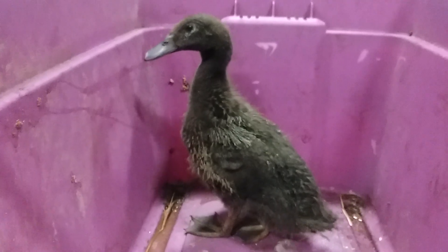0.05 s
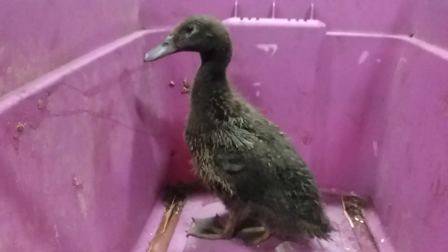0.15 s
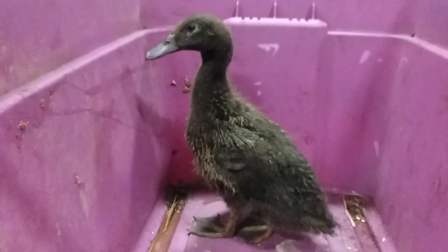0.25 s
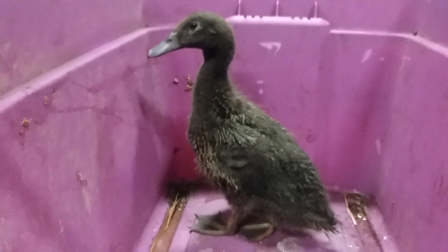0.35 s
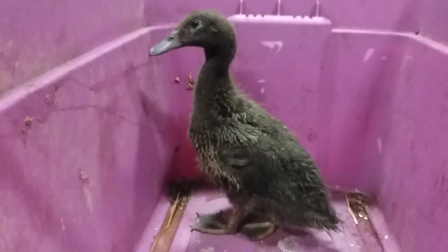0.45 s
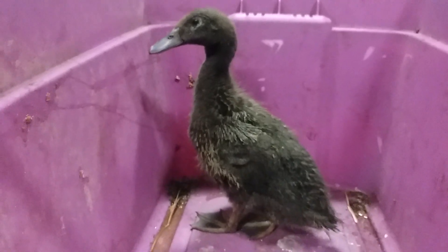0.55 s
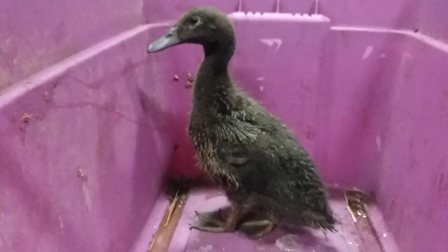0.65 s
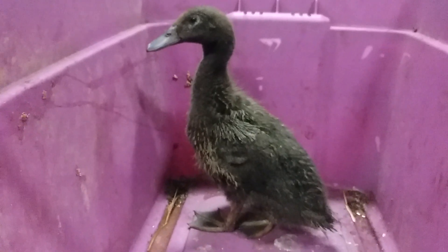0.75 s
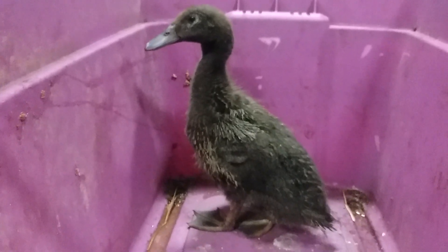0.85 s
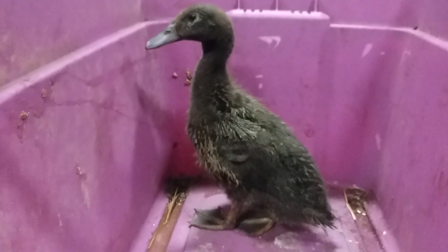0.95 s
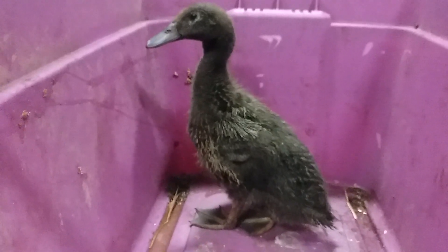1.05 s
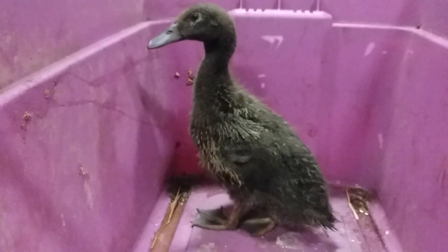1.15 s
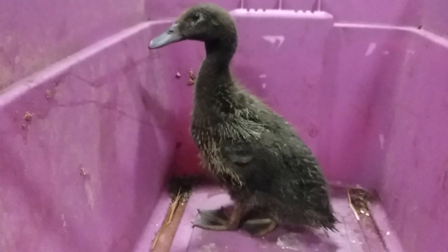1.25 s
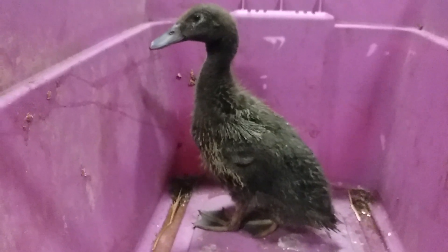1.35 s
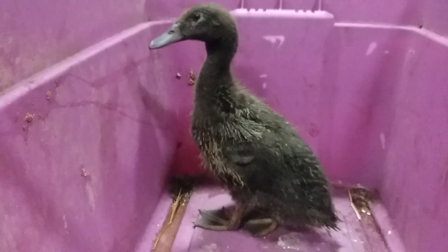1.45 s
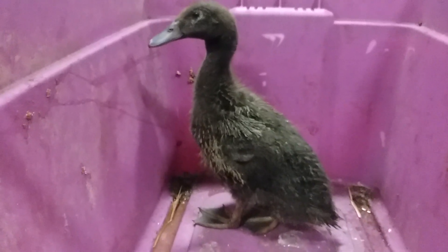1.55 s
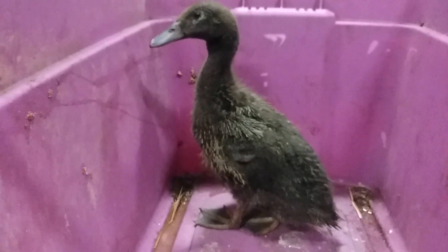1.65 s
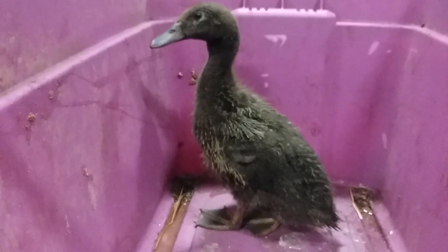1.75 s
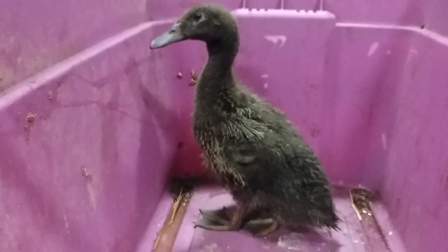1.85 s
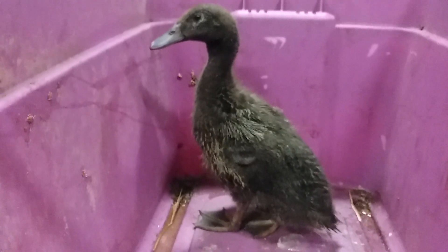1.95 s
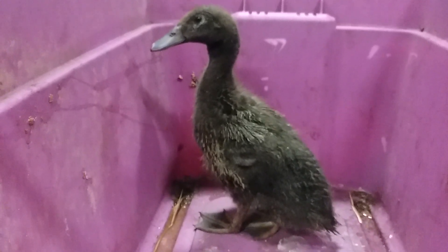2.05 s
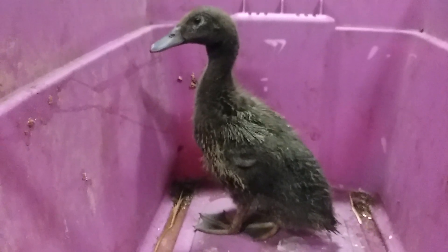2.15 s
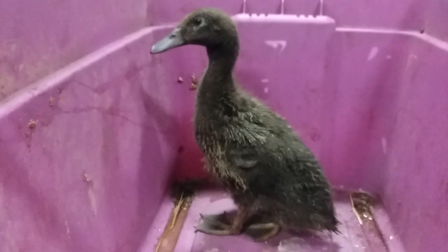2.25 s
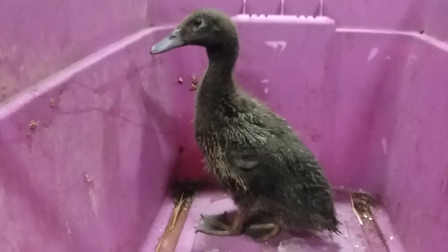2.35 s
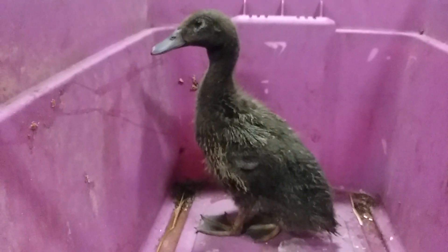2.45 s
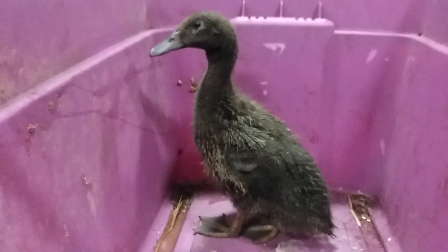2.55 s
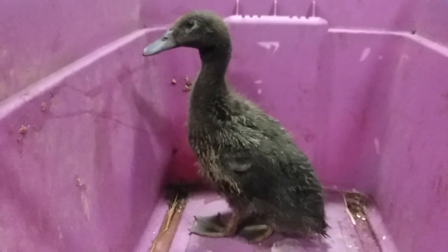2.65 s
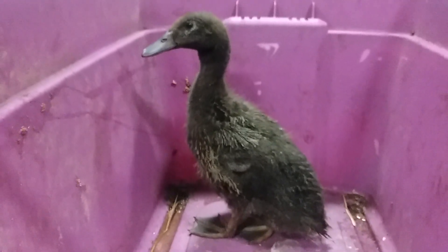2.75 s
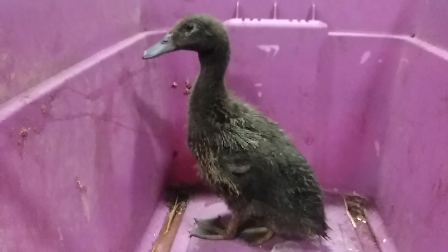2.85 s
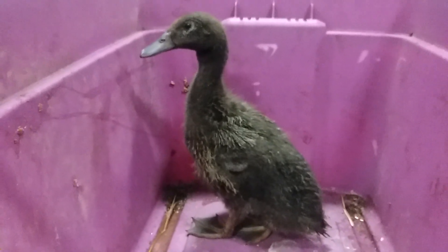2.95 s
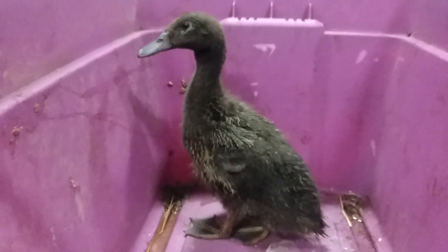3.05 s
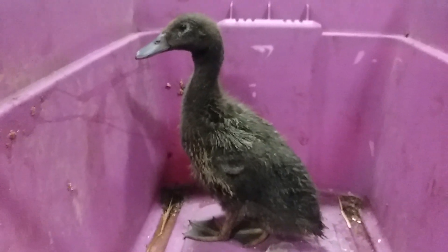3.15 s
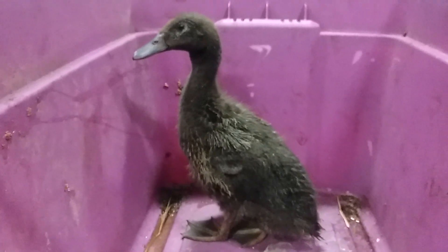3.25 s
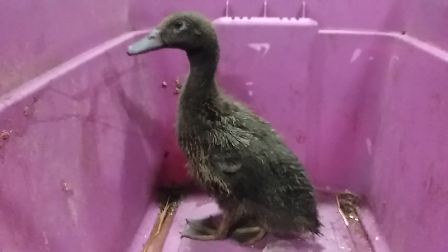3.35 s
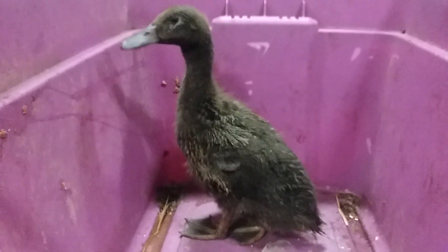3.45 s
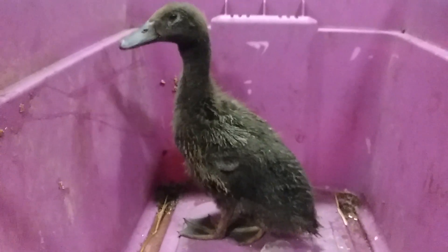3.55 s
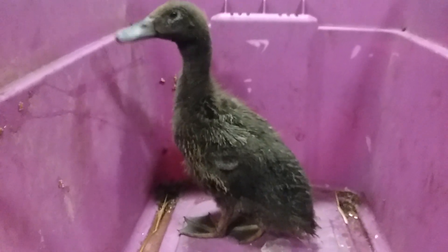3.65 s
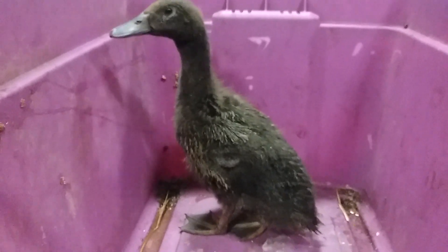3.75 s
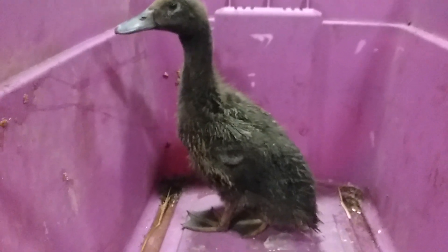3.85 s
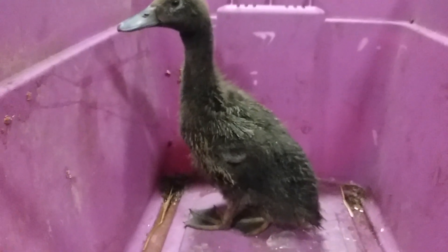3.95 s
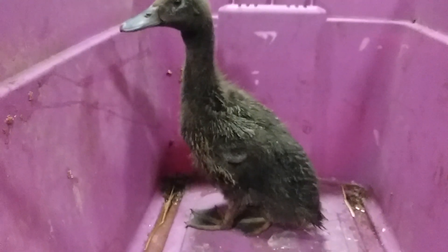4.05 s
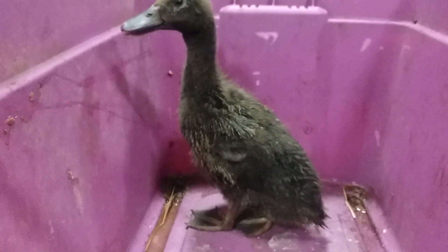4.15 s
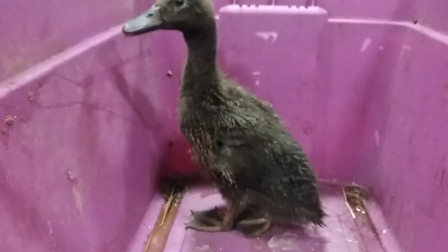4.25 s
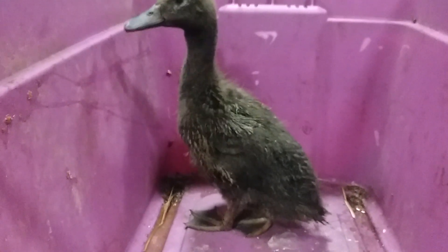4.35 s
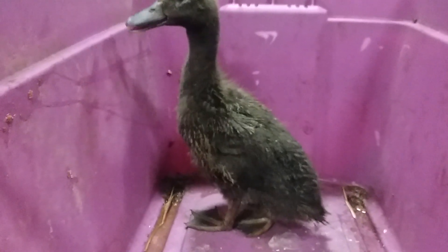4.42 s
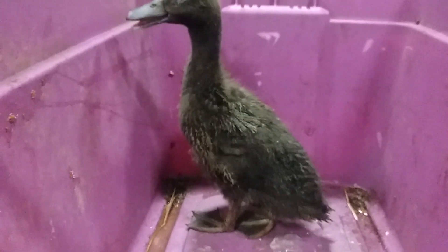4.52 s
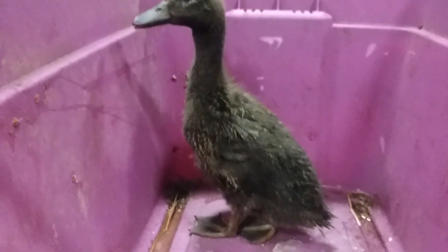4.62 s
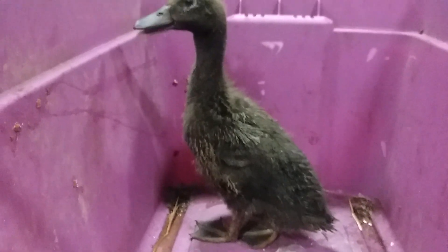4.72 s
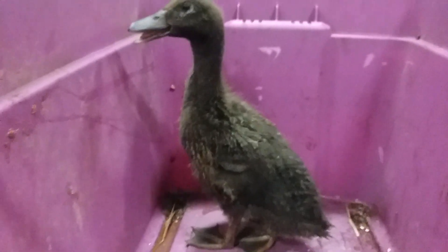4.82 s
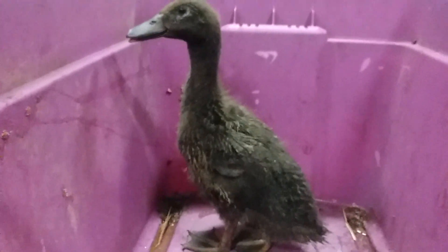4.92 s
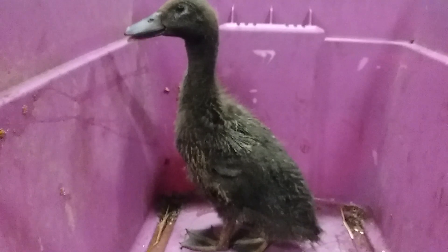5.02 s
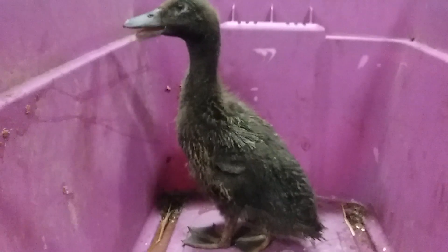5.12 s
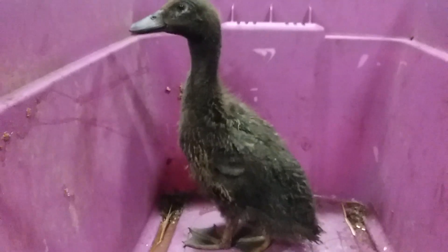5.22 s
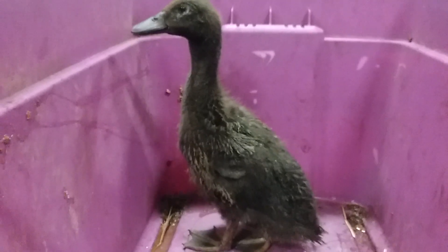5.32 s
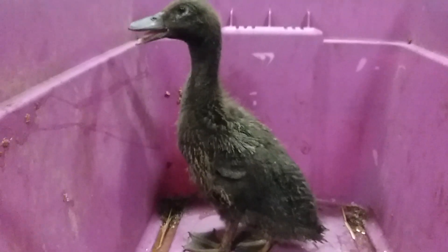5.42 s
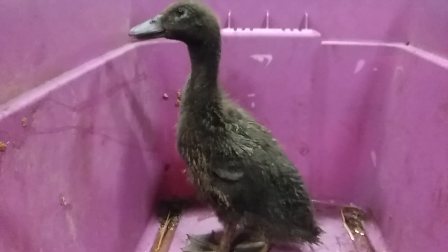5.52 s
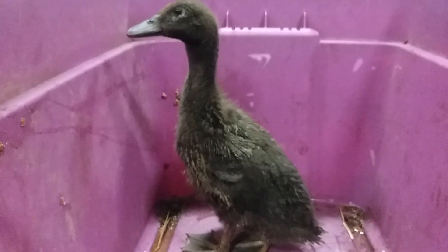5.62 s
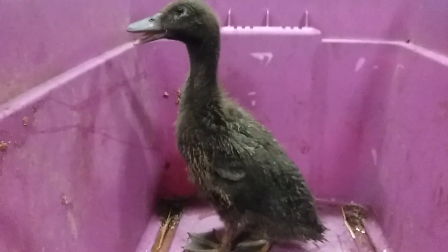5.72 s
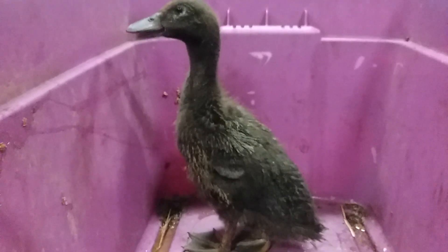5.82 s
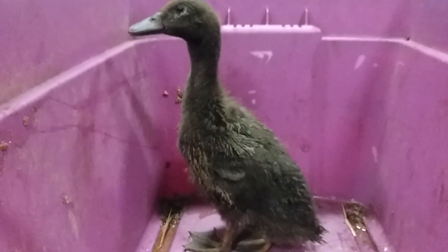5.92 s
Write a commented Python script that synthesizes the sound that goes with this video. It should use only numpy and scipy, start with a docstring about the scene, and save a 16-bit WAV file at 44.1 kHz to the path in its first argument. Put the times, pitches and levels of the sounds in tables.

```python
"""Indoors, a duckling stands in a plastic bin near two microphones, while other birds chirp far away.
After four seconds it peeps three times a second: each peep starts as a short rasping grunt, locks into
a loud whistle joined by a second, higher voice, and droops at the end. Its feet pat and scratch the bin.
The voice is built from sine waves, pulses and hiss, the feet from fading tones and filtered noise.
Standing waves in the bin and echoes color the sound; far birds are mostly gliding tones over patchy hiss."""
import sys
import numpy as np
from scipy import signal
from scipy.fft import rfft, irfft
from scipy.io import wavfile
from scipy.ndimage import uniform_filter1d

SR = 44100
rng = np.random.default_rng(int(sys.argv[2]) if len(sys.argv) > 2 else 0)


def generate_wav(signal):
    """Clip the signal to [-1, 1] and save it as 16-bit WAV at the path in sys.argv[1]."""
    frames = np.transpose(np.atleast_2d(signal))
    scaled = np.clip(frames, -1, 1) * 32767
    pcm = np.round(scaled).astype(np.int16)
    wavfile.write(sys.argv[1], SR, pcm)


N = 263718

# one row a peep: (start t/s, length/s, held pitch f/Hz, depth of the pitch sag f/Hz, effort/dB,
#                  relative throaty buzz/dB, relative rasp/dB, second voice enters after t/s,
#                  extra left minus right/dB as the head turns)
PEEP_ROWS = [(4.067, .141, 2000, 260, -6, -22.5, -39, .068, 3),
             (4.371, .135, 2035, 85, -5, -50, -18, .036, 3),
             (4.683, .133, 2120, 110, 0, -30, -13, .029, .5), (4.994, .133, 2150, 90, 0, -50, -13, .032, 3),
             (5.317, .133, 2155, 120, 0, -47, -13.5, .031, 6),
             (5.639, .138, 2140, 95, 0, -55, -15, .033, 6), (5.961, .135, 2140, 100, 0, -22, -16, .032, 0)]


def gain_of(db):
    """Turns decibels into amplitude."""
    return 10 ** (np.asarray(db) / 20)


def evened(x):
    """Scales a sound to an average strength (rms) of 1."""
    return x / np.sqrt(np.mean(abs(x) ** 2) + 1e-20)


def read(points, hz):
    """Reads a table between its points, on a log-frequency axis."""
    f, value = np.transpose(points)
    return np.interp(np.log(hz + 1), np.log(f + 1), value)


def add(mix, s, sound):
    """Mixes a sound in at time s, in seconds."""
    part = mix[max(round(s * SR), 0):][:len(sound)]
    part += sound[:len(part)]


def noise(points, size):
    """Makes hiss of rms 1 whose strength at each frequency follows a table."""
    shape = gain_of(read(points, np.fft.rfftfreq(size, 1 / SR)))
    return evened(irfft(rfft(rng.standard_normal(size)) * shape, size))


def waver(size, hz):
    """Makes a slow random wobble of rms 1, up to about hz."""
    damping = 1 + (np.fft.rfftfreq(size, 1 / SR) / hz) ** 2
    return evened(irfft(rfft(rng.standard_normal(size)) / damping, size))


def angle(hz):
    """Adds up a pitch curve into the running phase of a wave."""
    return 2 * np.pi * np.cumsum(hz) / SR


def step(t, width):
    """Rises smoothly from 0 to 1 around t = 0."""
    return (1 + np.tanh(t / width)) / 2


def resonate(x, hz, width):
    """Lets a sound ring around a pitch, fixed or moving, with gain 1 there; wide resonances die sooner."""
    turn = np.exp(1j * angle(hz * np.ones(len(x))))
    r = np.exp(-np.pi * width / SR)
    return 2 * (turn * signal.lfilter([1 - r], [1, -r], x / turn + 1e-18)).real


def peep(start, length, hold_hz, sag_hz, effort_db, buzz_db, rasp_db, second_after):
    """Two sides of the syrinx, the bird's voice box, whistle together and mix into faint extra tones."""
    # pitch of the second voice: (share of its length, f/Hz)
    second_pitch = [(0, 3564), (0.119, 3155), (0.298, 3085), (.6, 3050), (0.998, 3009)]
    # harmonics of the whistle: (multiple of its pitch, relative level/dB)
    harmonics = [(2, -38), (3, -37), (4, -47)]
    # the two voices mix: (multiple of the whistle, multiple of the second voice, relative level/dB)
    mixed_tones = [(0, 1, 0), (-1, 1, -16), (0, 2, -16), (2, 1, -20), (1, 2, -20)]
    # air through the throat and bill: (f/Hz, relative level per Hz/dB)
    breath = [(400, -9), (750, -26.5), (1100, 8.5), (1600, -5), (2400, 4), (2800, -18.5), (3700, -45),
              (4500, -8), (5200, -7), (6300, -6), (8200, -6.5), (9500, -21.5), (12000, -22.5), (16000, -27)]

    # weak peeps take longer to lock into a whistle
    crest = start + .0245 - .0011 * effort_db
    entry, end = start + second_after, start + length
    t = np.arange(start, end + .04, 1 / SR)

    # three stages: crest, sag, hold; the sine eases the moves between them
    stage = np.interp(t, crest + (end - crest) * np.array([0, .26, .7]), np.arange(3))
    stage -= .7 * np.sin(2 * np.pi * stage) / (2 * np.pi)

    # pitch climbs as the pressure builds and droops as it runs out
    building = 1 - .5 * np.exp((start - t) / .0065)
    running_out = 1 - .28 * np.exp(np.minimum(t - end, .003) / .008)
    steady_hz = np.interp(stage, np.arange(3), [2215, hold_hz - sag_hz, hold_hz])
    pitch = steady_hz * building * running_out
    first = angle(pitch * (1 + .003 * waver(len(t), 300)))

    # the crest depends less on effort than the rest
    stage_db = [-6.7 + .65 * effort_db, -9.1 + effort_db, -6.9 + effort_db]
    level = gain_of(np.interp(stage, np.arange(3), stage_db))
    fade = step(end - .001 - t, .002) * (1 - .62 * step(t - end + .012, .006))

    tone = np.sin(first) * (1 + .04 * waver(len(t), 290)) * step(t - crest + 0.0026, 0.0041)
    # the flapping of the grunt lingers in the whistle as a fading tremor
    tremor_hz, tremor_depth, tremor_s = 310, .15, .011
    tremor = np.exp(-abs(t - crest) / tremor_s) * np.sin(2 * np.pi * tremor_hz * (t - crest))
    tone *= 1 + tremor_depth * tremor
    overtones = sum(gain_of(db) * np.sin(k * first) for k, db in harmonics)
    overtones *= step(t - crest + .01, .004)
    overtones *= 1 + 1.3 * step(crest + .012 - t, .004)  # strongest early on
    overtones *= 1 + .55 * waver(len(t), 250)

    # the second voice starts under the whistle and swells toward the end
    second_db, swell_db = -35.5, 7
    progress = np.clip((t - entry) / (end - entry), 0, 1)
    second_hz = np.interp(progress, *np.transpose(second_pitch))
    second = angle(second_hz * (1 + 0.0067 * waver(len(t), 200)))
    joined = step(t - entry - .002, .004) * gain_of(second_db + swell_db * progress)
    mixed = sum(gain_of(db) * np.sin(j * first + k * second) for j, k, db in mixed_tones)
    mixed *= 1 + .3 * waver(len(t), 150)
    whistle = fade * (level * (tone + overtones) + joined * mixed)

    # air hisses most while the whistle is taking hold; weak peeps leak more air
    blowing = step(t - start - .006, .003) * step(end + .004 - t, .005) * (1 + .2 * waver(len(t), 300))
    burst = 1 + 1.9 * np.exp(-((t - crest + .005) / .01) ** 2)
    air = gain_of(-43) * burst * noise(breath, len(t))
    leak = gain_of(-69 - 3.1 * effort_db) * rng.standard_normal(len(t))
    return whistle + blowing * (air + leak) + grunt(t - start, pitch, buzz_db, rasp_db, crest - start)


def grunt(t, pitch, buzz_db, rasp_db, crest):
    """Slack membranes flap at a low, rising rate; each flap rings the throat, which follows the pitch."""
    flap_hz = 267 + 85 * step(t - .78 * crest, .006)
    flap = angle(flap_hz * (1 + .015 * waver(len(t), 150)))
    pulses = evened(sum(np.cos(k * flap) for k in range(2, 13)))

    # the rasp grows until the whistle locks
    drive = pulses + .4 * rng.standard_normal(len(t))
    ring = evened(resonate(resonate(resonate(drive, pitch, 730), pitch, 1300), pitch, 1900))
    rasping = step(t - .005, .002) * step(crest - t, .006)
    rasping *= np.exp((np.minimum(t, crest) - crest / 2) / .025)

    # the hum is the flapping itself, soon dying away
    hum = np.sqrt(2) * np.sin(flap) + gain_of(-16) * np.sin(2 * flap)
    hum *= step(t - .005, 0.0029) * np.exp(-np.maximum(t - .018, 0) / 0.0096)

    # the throaty buzz is brief and keeps fixed resonances
    buzz = evened(resonate(resonate(pulses, 1080, 300), 1080, 1500) + .05 * resonate(pulses, 560, 300))
    buzz *= step(t - .006, 0.0038) * step(.022 - t, 0.0028)
    return gain_of(rasp_db - 7) * ring * rasping + gain_of(-31.5) * hum + gain_of(buzz_db + 4) * buzz


def feet_and_short_noises():
    """Webbed feet flex the bin floor in soft pats; filtered noise makes scratches and one steep chirp."""
    # steps on the bin floor: (t/s, relative level/dB, lowest tone of the first pat f/Hz)
    steps = [(5.405, -35.5, 175), (5.718, -35, 162)]
    # scratches of claws and litter on the plastic, and at 1.335 s a short steep chirp made of
    # filtered noise: (t/s, relative level/dB, center f/Hz, decay/s)
    short_noises = [(.115, -48, 3400, .022), (.765, -53.5, 790, .063), (1.107, -62, 4960, .11),
                    (1.335, -56, 2530, .022), (1.7, -68.5, 6400, .16), (1.9, -70, 6440, .15),
                    (2.715, -54.5, 860, .094), (3.021, -53.5, 950, .059), (3.391, -51, 4730, .004),
                    (3.69, -58, 3500, .02), (5.81, -46, 976, .09)]
    # each step is a short run of pats, ever softer, their lowest tone ever lower
    pat_gap_s, pat_fade_db, pat_drop_hz = .047, 3, 12

    out, t = np.zeros(N), np.arange(SR // 4) / SR
    pat_shape = (1 - np.exp(-t / 0.0027)) * np.exp(-t / 0.02)
    for s, db, hz in steps:
        for k in range(4):
            panel = np.sin(2 * np.pi * (hz - k * pat_drop_hz) * t)
            panel += gain_of(-8.5) * np.sin(2 * np.pi * 335 * t)
            panel += gain_of(-25) * np.sin(2 * np.pi * 550 * t) * np.exp(-t / 0.025)
            add(out, s + k * pat_gap_s, gain_of(db - k * pat_fade_db) * panel * pat_shape)
    for s, db, hz, decay in short_noises:
        burst = evened(resonate(resonate(rng.standard_normal(len(t)), hz, hz), hz, hz))
        add(out, s, gain_of(db) * burst * np.exp(-t / decay))
    return out


def ports(x):
    """Direct sound plus the bin's standing waves: the whistle swings between the sides as its pitch moves."""
    # standing waves in the bin: (f/Hz, width f/Hz, signed share at the left microphone, at the right)
    bin_modes = [(2131.6, 91.5, -0.86, 0.95), (2137, 28, 0.32, .02), (2364, 21, 1, 1.8),
                 (4555, 130, 1, 3.6), (7450, 150, -0.35, 0.67)]
    # phase by which the left microphone leads: (f/Hz, phase/rad)
    left_lead = [(20, 6.5), (300, 0.07), (1100, 3.5), (2100, 4.5), (3100, 8), (4400, 8), (16000, 8.5)]
    # the right microphone favors the treble: (f/Hz, left minus right/dB)
    treble_shade = [(2400, 0), (3000, -6), (4400, -5), (6200, -5), (8000, -1), (12000, -3)]

    pair = np.outer([1.3, .65], x)
    pair += sum(np.outer([left, right], resonate(x, hz, width)) for hz, width, left, right in bin_modes)
    size = N + SR
    hz = np.fft.rfftfreq(size, 1 / SR)
    lean = gain_of(read(treble_shade, hz) / 2)
    sides = np.array([lean * np.exp(1j * read(left_lead, hz)), 1 / lean])
    return irfft(rfft(pair, size) * sides, size)[:, :N]


def head_turn(pair):
    """The whistle's band leans toward the left by a varying amount as the head turns, steady in each peep."""
    times = [s for start, length, *_ in PEEP_ROWS for s in (start, start + length)]
    leans_db = np.repeat([row[-1] for row in PEEP_ROWS], 2)
    pan_db = np.interp(np.arange(N) / SR, times, leans_db, left=0)
    band = signal.butter(2, [1500, 2700], "band", fs=SR, output="sos")
    whistle = signal.sosfiltfilt(band, pair)
    return pair + (gain_of(np.outer([.5, -.5], pan_db)) - 1) * whistle


def echoes(x, t60s, delay):
    """Dense reflections, each band dying at its own speed (time to fall 60 dB), unrelated on the two sides."""
    hz, t, z = signal.stft(rng.standard_normal((2, SR)), SR, nperseg=256)
    tail = signal.istft(z * gain_of(-60 * t / read(t60s, hz)[:, None]), SR, nperseg=256)[1]
    tail *= step(np.arange(tail.shape[1]) / SR - delay, delay / 2)
    return signal.fftconvolve(x[None], tail / np.linalg.norm(tail[0]), axes=1)[:, :N]


def far_birds():
    """Other birds give falling chirps, level whistles and one squeak, all made of thin gliding tones."""
    # falling chirps: (t/s, middle pitch f/Hz, relative level/dB)
    chirps = [(.298, 2800, -57.5), (.454, 2520, -57.5), (.575, 2760, -55.5), (.705, 2570, -53.5),
              (.855, 2750, -59.5), (1.452, 2330, -52.5), (1.495, 2050, -57), (1.979, 2600, -56),
              (3.19, 2600, -63), (3.4, 2540, -62.5), (3.76, 2900, -57.5), (3.908, 3000, -58.5)]
    # level whistles: (t/s, length/s, pitch f/Hz, relative level/dB)
    whistles = [(1.851, .14, 1350, -61.5), (2.088, .06, 2550, -57), (2.209, .1, 2700, -65),
                (2.324, .12, 4250, -67), (2.464, .2, 1480, -66.5), (2.456, .1, 2120, -70),
                (2.49, .16, 4680, -68), (2.793, .12, 2620, -61.5), (3.843, .22, 1445, -63.5),
                (3.899, .04, 4070, -52.5), (5.901, .052, 3950, -58.5)]

    out = np.zeros(N)
    for s, hz, db in chirps:
        # each chirp falls fast, then flattens
        add(out, s, gain_of(db) * glide(.06, [hz * 1.28, hz, hz * .84]))
    for s, length, hz, db in whistles:
        add(out, s, gain_of(db) * glide(length, [hz, hz, hz]))
    add(out, *squeak())
    return out


def glide(length, contour_hz):
    """A thin, unsteady note slides through a start, middle and end pitch."""
    u = np.linspace(0, 1, int(length * SR))
    pitch = np.polyval(np.polyfit([0, .5, 1], contour_hz, 2), u) * (1 + .015 * waver(len(u), 250))
    flutter = 1 + .6 * waver(len(u), 120)
    return evened(np.sin(angle(pitch)) * flutter * signal.windows.tukey(len(u), .4))


def squeak():
    """A hoarse start, with tones at half and one and a half times the pitch, clears into a thin whistle."""
    # its pitch dips and rises again: (t/s, f/Hz, relative level/dB)
    squeak_points = [(.111, 2470, -35), (.135, 2150, -48), (.152, 1900, -44), (.175, 2400, -52),
                     (.21, 2700, -58)]
    s, hz, db = np.transpose(squeak_points)
    t = np.arange(s[0], s[-1], 1 / SR)
    turn = angle(np.interp(t, s, hz) * (1 + .012 * waver(len(t), 250)))
    hoarse_db, hoarse_s = -7, .009
    hoarse = np.sin(turn / 2) + .5 * np.sin(turn + turn / 2)
    hoarse *= gain_of(hoarse_db) * np.exp((s[0] - t) / hoarse_s)
    level = gain_of(np.interp(t, s, db)) * np.sqrt(2)
    return s[0], level * (np.sin(turn) + hoarse) * signal.windows.tukey(len(t), .08)


def flock():
    """Many more birds, too far to tell apart, blend into falling chirps over a patchy hiss."""
    # color of the blur: (f/Hz, relative level per Hz/dB)
    blur_color = [(1000, -.5), (2000, -19), (2500, -10.5), (3300, 3.5), (4200, -6), (4900, 0.5),
                  (5400, -25.5), (7000, -17.5), (8600, -28), (9500, -53)]
    # rise and fall of the whole flock: (t/s, relative level/dB)
    flock_level = [(0.0, -61), (0.75, -61), (0.96, -67), (1.91, -65), (2.15, -70), (2.56, -67), (3.03, -68),
                   (3.73, -61), (4.45, -62), (4.58, -60), (5.2, -68), (5.98, -62)]

    chatter, u = np.zeros(N), np.linspace(0, 1, int(.06 * SR))
    for when, high, fall, size in rng.random((100, 4)):
        pitch = (2900 + 2100 * high) * (1 - (.1 + .2 * fall) * u) * (1 + .012 * waver(len(u), 300))
        add(chatter, when * N / SR, gain_of(7 * size) * np.sin(angle(pitch)) * np.sin(np.pi * u))
    chatter = evened(echoes(chatter, [(2000, 0.099), (5000, 0.11)], delay=.002))

    # random patches of time and pitch, the same on both sides, make the hiss uneven
    z = signal.stft([noise(blur_color, N), noise(blur_color, N)], nperseg=512)[2]
    patches = uniform_filter1d(rng.standard_normal(z.shape[1:]), size=4, axis=0)
    patches = evened(uniform_filter1d(patches, size=8, axis=1))
    blur = evened(signal.istft(z * gain_of(2.8 * patches), nperseg=512)[1][:, :N])
    swell = gain_of(np.interp(np.arange(N) / SR, *np.transpose(flock_level)))
    return swell * (gain_of(3) * blur + gain_of(-4) * chatter)


def background():
    """Low room noise is filtered hiss, alike on both sides in the bass."""
    # color of the noise: (f/Hz, relative level per Hz/dB)
    floor_color = [(20, -58), (32, -36), (55, -2), (110, 3.5), (230, -0.5), (500, -6.5), (800, -25),
                   (1900, -23), (2600, -17.5), (4700, -26), (5600, -29.5), (8100, -29.5), (10900, -38),
                   (14200, -28.5)]
    # likeness of the two sides: (f/Hz, share from 0 to 1)
    likeness = [(60, 0.99), (180, 0.96), (550, 0.75), (1650, 0.2), (4970, 0.05), (15000, 0.01)]
    same = np.clip(read(likeness, np.fft.rfftfreq(N, 1 / SR)), -1, 1)
    left, other = noise(floor_color, N), noise(floor_color, N)
    right = irfft(same * rfft(left) + np.sqrt(1 - same ** 2) * rfft(other), N)
    return gain_of(-56.5) * np.array([left, right])


def scene():
    """Mixes the duckling in its bin, the room around it and the birds beyond."""
    # the room's echoes: (f/Hz, time to fall 60 dB t/s)
    room_decay = [(200, 0.38), (1000, 0.95), (1650, 0.6), (2120, 0.78), (2500, 1), (3000, 0.11),
                  (4500, 0.59), (8000, 0.37), (15000, 0.34)]
    duck, birds = np.zeros(N), far_birds()
    for row in PEEP_ROWS:
        add(duck, row[0], peep(*row[:-1]))
    near = duck + feet_and_short_noises()

    # long waves reach both microphones alike
    bass = signal.sosfilt(signal.butter(2, 600, fs=SR, output="sos"), near)
    treble = signal.sosfilt(signal.butter(2, 600, "high", fs=SR, output="sos"), near)
    direct = head_turn(ports(treble)) - bass

    walls = gain_of(-12.5) * echoes(treble, [(300, .08), (8000, .07)], delay=.003)
    # one narrow standing wave rings on between the peeps, opposite on the two sides
    ring_hz, ring_width_hz, ring_db = 2130, 4, -22.5
    ring = gain_of(ring_db) * np.outer([1, -1], resonate(near, ring_hz, ring_width_hz))
    room = gain_of(-26.3) * echoes(near, room_decay, delay=0.021)
    beyond = gain_of(-3) * birds + gain_of(-4) * echoes(birds, [(1000, .3), (5000, .18)], delay=.004)
    return direct + walls + ring + room + beyond + flock() + background()


def record(dry):
    """Cuts the rumble below 38 Hz and the treble above 15900 Hz."""
    dry = signal.sosfilt(signal.butter(4, 38, "high", fs=SR, output="sos"), dry)
    band_limit = signal.firwin(511, 15900, window=("kaiser", 9), fs=SR)
    return signal.oaconvolve(dry, band_limit[None], "same")


dry = scene()
out = record(dry)
generate_wav(out)
```